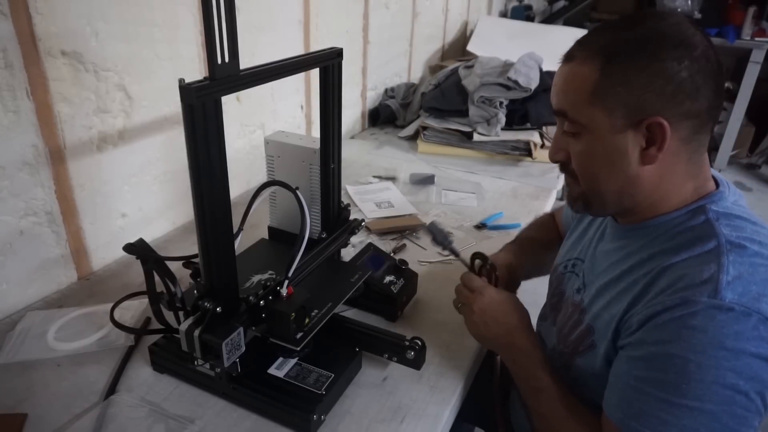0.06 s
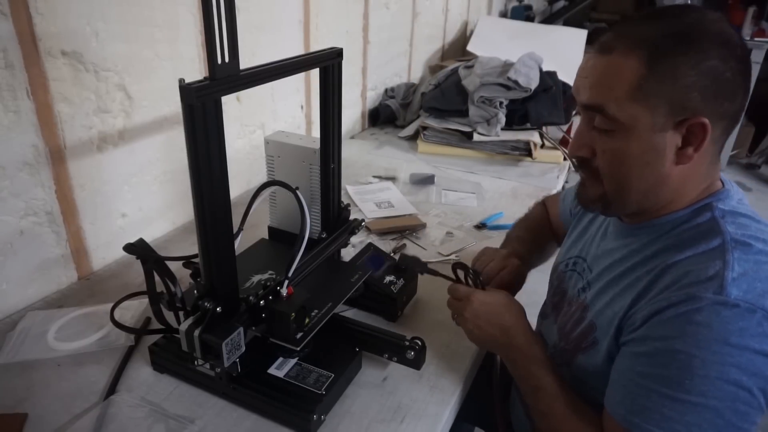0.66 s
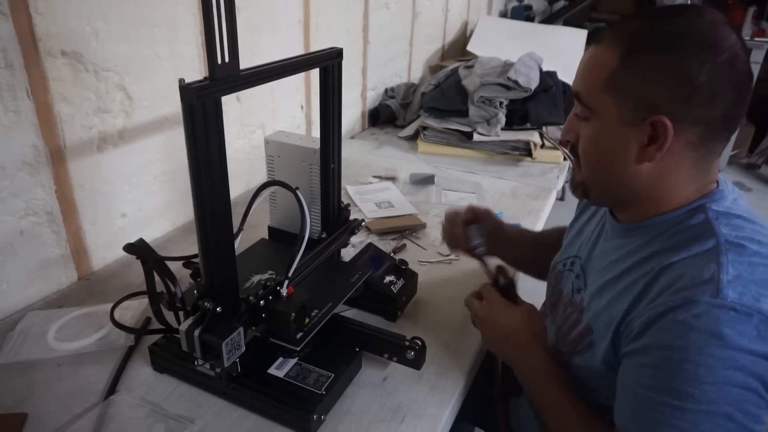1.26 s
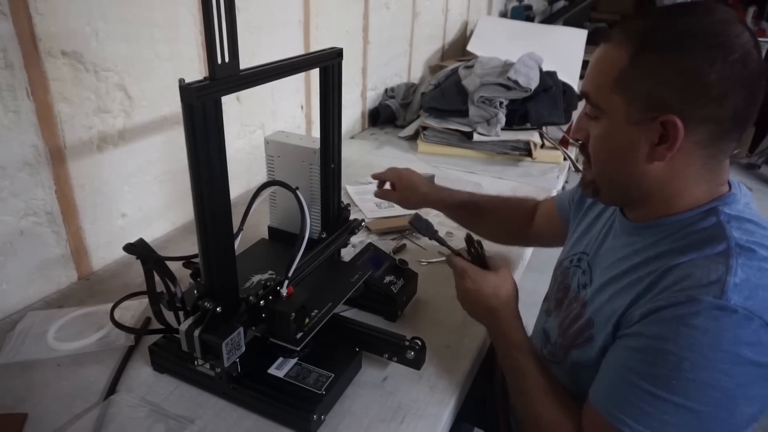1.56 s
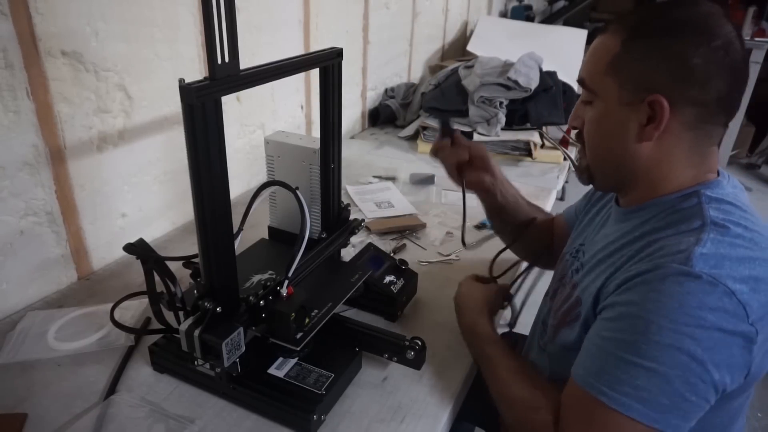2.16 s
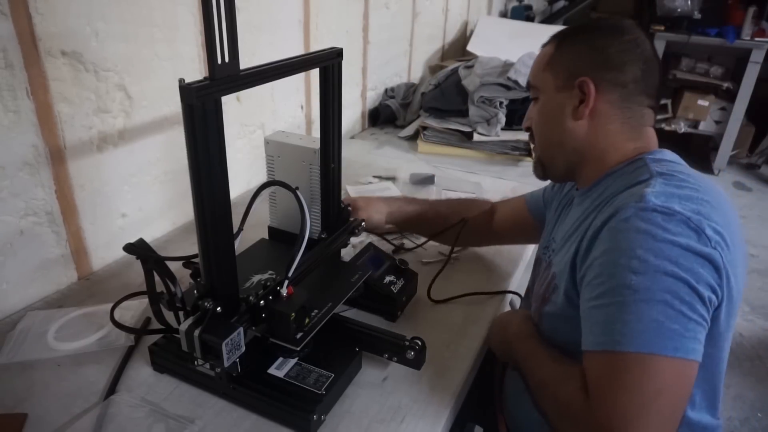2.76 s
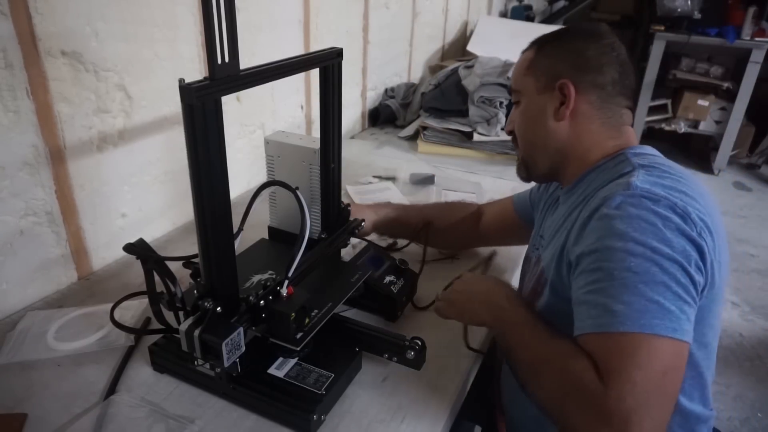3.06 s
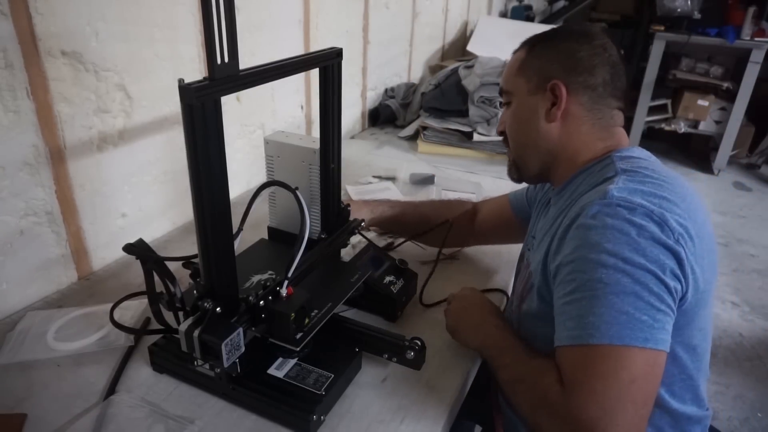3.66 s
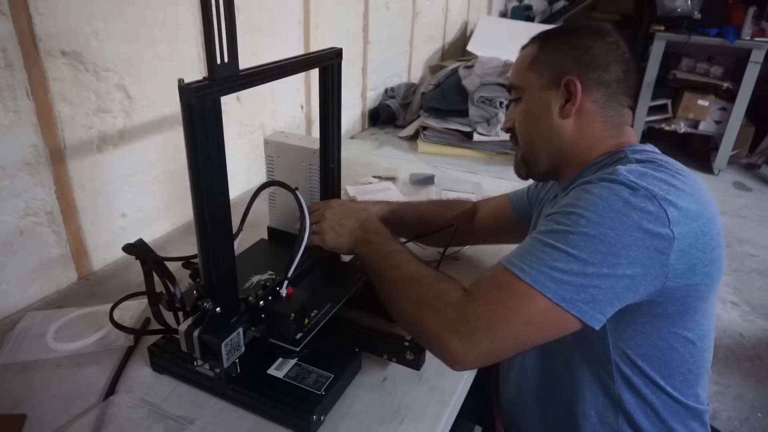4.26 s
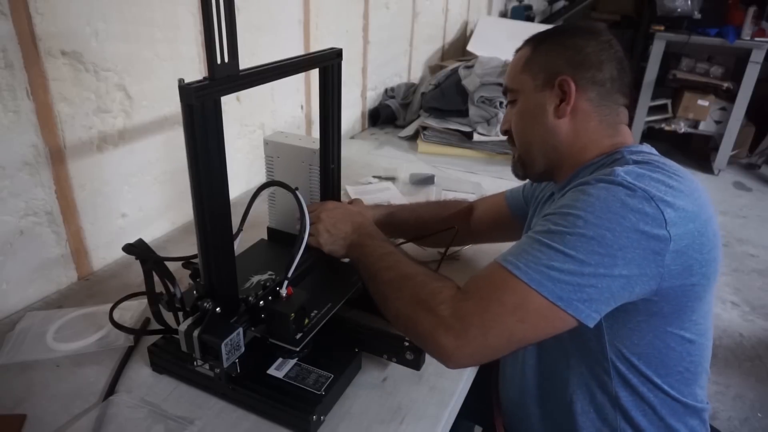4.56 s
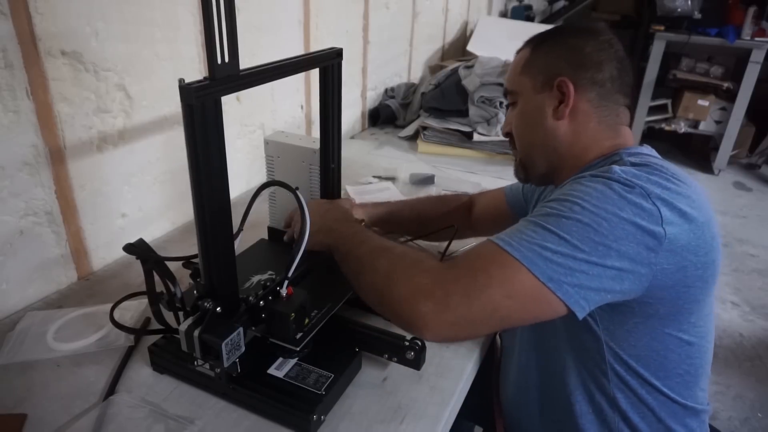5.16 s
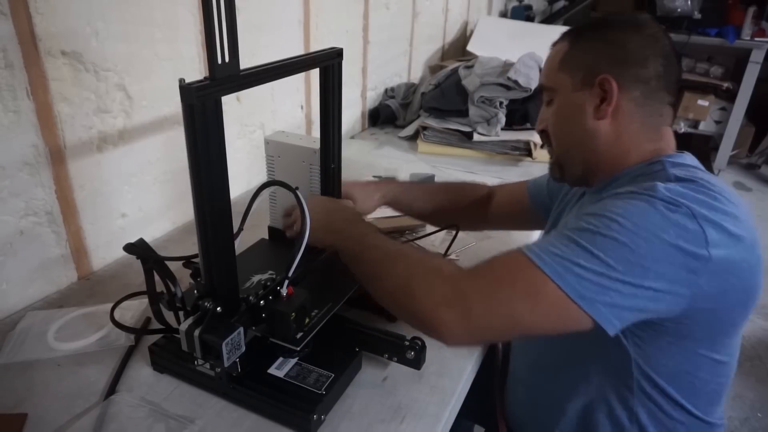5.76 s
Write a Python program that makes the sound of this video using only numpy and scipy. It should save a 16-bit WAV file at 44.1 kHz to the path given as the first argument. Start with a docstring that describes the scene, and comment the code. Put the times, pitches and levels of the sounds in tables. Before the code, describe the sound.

Loud slaps of a cable and plug on a ringing workbench, followed by light plastic taps, dull bumps and a snap as it plugs in.

```python
"""Faint ticks and the brush of a sleeve come first, then loud slaps as a power cord is unwound.
Its plug and loops hit a workbench, which rings, and bump a small machine's metal frame.
The cord drags over the bench and jingles a small steel part. Then the plug is fumbled into its
socket with light ticks, dull bumps and a snap. A bare workshop echoes, over a low rumble and hiss."""
import sys
import numpy as np
from scipy import signal
from scipy.fft import rfft, irfft, next_fast_len
from scipy.io import wavfile
from scipy.ndimage import uniform_filter1d

SR = 44100
rng = np.random.default_rng(int(sys.argv[2]) if len(sys.argv) > 2 else 0)


def unload_wav(signal):
    """Save mono or channel-first audio to the path in sys.argv[1] as 16-bit WAV at rate SR, clipped to [-1, 1]."""
    wavfile.write(
        sys.argv[1],
        SR,
        np.round(np.clip(np.atleast_2d(signal).T, -1, 1) * 32767).astype(np.int16),
    )


N = 261072
T = np.arange(SR // 2) / SR  # seconds within one hit


# Hits on the bench: start_s, level_db, hardness_db (plug high, soft cord low), thump_db, hollow_db
BENCH_HITS = [(1.664, -25, 7.5, -14, -3), (1.872, -36, 5, -12, -5), (2.0585, -17.5, -3, -15, 0),
              (2.1875, -26.5, -7, -21, -1), (2.425, -20, 1.5, -8.5, -2.5), (2.487, -20.5, -0.5, -6.5, -4.5),
              (2.627, -17.5, 1, -9.5, -4), (2.721, -18.5, -1.5, -4, -8.5), (2.804, -23, -1, -10, -11.5),
              (2.837, -25.5, -0.5, -19, -6), (2.917, -27.5, -1, -14, -15), (2.999, -34, 9, -25, -12),
              (3.038, -20, 1, -14.5, -7.5), (3.159, -28.5, -2.5, -14.5, -6.5),
              (3.204, -30.5, -12, -15, -8.5), (3.522, -35.5, -4.5, -13.5, -2), (3.546, -37.5, -8, -3, -12),
              (3.576, -43.5, 4, -4, -3), (3.639, -15, -.5, -14.5, -8.5), (3.738, -18, 0, -15.5, -5.5)]
# The bench's own notes: pitch_hz, level_db, fade_s (a fade is the time to drop by 60 dB)
BENCH_NOTES = [(164.1, -3, 0.38), (185.7, -9.5, 0.37), (306.7, -2, 0.34), (386.6, -4.5, 0.29),
               (466.7, -2, 0.27), (484, -10.5, 0.23), (575, -7, 0.26), (634.5, 3, 0.14), (760, 2, 0.12),
               (862, -14, 0.15), (1002, -8, 0.18), (1065, -8.5, 0.2), (1136, -12, 0.18), (1317, -5.5, 0.22),
               (1448, -5.5, 0.22), (1964, -15.5, 0.46), (2270, -10, 0.27), (2510, -3, 0.098),
               (2750, -21, 0.29)]
# The tone of a slap: pitch_hz, level_db
SLAP_TONE = [(40, -39), (100, -20.5), (150, -1), (240, -4), (450, -3), (800, -5.5), (1400, -6),
             (2700, -5.5), (4200, -20.5), (5300, -32.5), (9000, -42.5), (13000, -39), (16000, -49)]
# A hit's thump, hollow knock, body, clack and snap: low_hz, high_hz
HIT_BANDS = [(100, 300), (300, 600), (600, 1500), (1500, 4500), (5000, 15000)]
def bench_slaps(clack_db=-6.5, snap_db=-25, snap_growth=2.04, notes_db=-3):
    """Plug and cord slap the bench, which rings; a harder hit gains clack, and even more snap."""
    out = np.zeros((2, N))
    for start_s, db, hardness, thump, hollow in BENCH_HITS:
        crack = contact(crack_db=2.5, crack_fade_s=0.016, bounce_db=0, echo_db=-12.5, echo_fade_s=0.4)
        slap = colour(crack, SLAP_TONE)
        board = ring(BENCH_NOTES, scatter_db=3.55)
        board = colour(board, [(30, -23), (140, 3.5)])  # a small board gives no deep bass
        hit = unit(slap) + amp(notes_db) * unit(board)
        bands_db = db + np.array([thump, hollow, 0, clack_db + hardness, snap_db + snap_growth * hardness])
        add(out, start_s, set_bands(hit, HIT_BANDS, bands_db, samples=SR // 20))
    return stereo(out, STEREO_WIDTH, left_db=-3.5)


# Light taps of the plug: start_s, level_db, hardness_db, scrape_s
PLUG_TAPS = [(.612, -62, 7, 0.0088), (.837, -58, 5, .01), (1.097, -58.5, 1.5, 0.0072),
             (1.146, -61.5, 13.5, 0.018), (1.194, -62, 11, .001), (1.643, -46, 6, .001),
             (1.743, -44, 5, .008), (1.999, -46.5, 5, 0.0057), (3.394, -42.5, -17, 0.0084),
             (4.122, -41.5, -12.5, 0.0035), (4.381, -46.5, -6, .005), (4.41, -47.5, -8, .03),
             (4.526, -42.5, -14, .004), (4.558, -39, -8.5, 0.037), (4.658, -43.5, -8.5, 0.015),
             (4.709, -44, -4.5, 0.015), (4.876, -40, -6.5, .003), (5.004, -39.5, -1, 0.0086),
             (5.084, -40, -4, .0075), (5.408, -47.5, -4.5, .02), (5.493, -30.5, 1, 0.0049),
             (5.724, -47, -3, .012), (5.799, -52, 6.5, 0.0027)]
# The notes of the plug's shell: pitch_hz, level_db, fade_s
SHELL_NOTES = [(712, -5, 0.11), (1416, -1.5, 0.11), (1720, -4, 0.065), (2130, -11, 0.2), (2720, 0.5, 0.035),
               (3090, -3, 0.032), (3560, -14, .11)]
# The tone of tapped plastic: pitch_hz, level_db
PLASTIC_TONE = [(60, -20), (250, 0), (600, 2.5), (1500, 4.5), (3200, 8), (4500, -4.5), (7000, -8),
                (16000, -14)]
# A tap's body, clack and snap: low_hz, high_hz
TAP_BANDS = [(400, 1500), (1500, 4500), (5000, 15000)]
def plug_ticks(snap_db=-15.5, snap_growth=1.9, shell_db=-7):
    """The plug taps and skids on fingers, cord and socket rim; its shell rings. Harder is brighter."""
    out = np.zeros((2, N))
    for start_s, db, hardness, scrape_s in PLUG_TAPS:
        crack = contact(crack_db=10.5, crack_fade_s=0.016, bounce_db=-2.5, echo_db=-4, echo_fade_s=0.34)
        tap = unit(colour(crack, PLASTIC_TONE))
        pressure = np.interp(T / scrape_s, [0, 0.5, 1], [0.4, 1, 0])
        shell = amp(shell_db) * unit(ring(SHELL_NOTES, scatter_db=4))
        skid = chatter(tap + shell, pressure, per_s=700)
        bands_db = db + np.array([0, hardness, snap_db + snap_growth * hardness])
        add(out, start_s, set_bands(skid, TAP_BANDS, bands_db, samples=SR // 25))
    return stereo(out, STEREO_WIDTH, left_db=-3.5)


# The tone of the socket's springs: pitch_hz, level_db
SPRING_TONE = [(1500, -30), (4000, -5), (4900, 1.5), (5600, -12), (8000, -16), (14000, -38)]
def socket_snap(start_s=5.494, level_db=-36):
    """The plug snaps home with a dry, bright crack of the contact springs."""
    out = np.zeros((2, N))
    crack = contact(crack_db=10.5, crack_fade_s=0.026, bounce_db=-3, echo_db=-11, echo_fade_s=0.35)
    snap = colour(crack, SPRING_TONE)
    add(out, start_s, amp(level_db) * snap / np.std(snap[0, :SR // 33]))
    return stereo(out, STEREO_WIDTH, left_db=-2)


# Pushes on the machine's frame: start_s, level_db
FRAME_PUSHES = [(2.72, -27), (4.4, -36.5), (4.477, -32.5), (4.603, -21.5), (4.832, -23), (5.44, -34),
                (5.519, -23.5), (5.544, -22.5), (5.765, -29.5)]
# The frame's low notes: pitch_hz, level_db, fade_s
FRAME_NOTES = [(52, -24, 0.32), (81, -27, 0.46), (133, -23, 0.56), (155.4, 1.5, 0.26), (190, -12.5, 0.11),
               (310.6, -11.5, 0.197)]
# The tone of the trembling bench: pitch_hz, level_db
SHAKE_TONE = [(20, -17), (55, -9), (150, 4.5), (220, -8), (500, -26), (2000, -76)]
def frame_bumps(rise_s=0.0045, shake_db=-14, shake_fade_s=0.7, rock_s=0.09, rock_loss_db=9):
    """A soft push rings the frame and shakes the bench; then the frame rocks back once, softer."""
    out = np.zeros((2, N))
    swell = 1 - np.exp(-T / rise_s)
    for start_s, db in FRAME_PUSHES:
        for delay_s, loss_db in [(0, 0), (rock_s, rock_loss_db)]:
            tremble = unit(colour(rng.standard_normal(len(T)), SHAKE_TONE))
            shake = amp(shake_db - 60 * T / shake_fade_s) * tremble
            frame = ring(FRAME_NOTES, scatter_db=1.1)[0]
            add(out, start_s + delay_s, amp(db - loss_db) * (frame + shake) * swell)
    return out


# Nudges of the steel part: start_s, level_db, fade_ratio (multiplies each fade_s below)
STEEL_NUDGES = [(2.864, -34, 0.43), (2.922, -45, .9), (2.962, -43, 0.9), (2.985, -47, 1),
                (3.263, -59.5, .3), (3.523, -68, 1.5), (4.560, -63, 2), (4.614, -65, 2)]
# The steel part's high notes: pitch_hz, level_db, fade_s
STEEL_NOTES = [(7450, -18, .15), (7920, -4, 0.15), (11510, -10, 0.16), (11990, -7, .14), (12310, -4, 0.22),
               (12610, -12, 0.12), (13210, -13, .4)]
def steel_jingles(rattle_fade_s=0.086, grit_db=-6):
    """A small steel part rattles, and every touch makes it ring."""
    out = np.zeros((2, N))
    for start_s, db, fade_ratio in STEEL_NUDGES:
        metal = ring(np.array(STEEL_NOTES) * [1, 1, fade_ratio], scatter_db=1.4)
        grit = amp(grit_db) * colour(dense_ring(), [(4000, -13), (7500, -7)])
        rattle = chatter(metal + grit, amp(-60 * T / rattle_fade_s), per_s=600)
        add(out, start_s, amp(db) * rattle / np.std(rattle[0, :SR // 20]))
    return stereo(out, STEREO_WIDTH, left_db=0)


# The tone of the cord rubbing on the bench: pitch_hz, level_db
DRAG_TONE = [(47, -51), (80, -4.5), (152, 1.5), (361, -7), (404, 1), (1020, -0.5), (1120, -4), (2430, -12),
             (6310, -34), (7700, -37), (10500, -39.5), (12000, -37), (16000, -36)]
def cord_drag(peak_slips_per_s=300, spread_db=4, rub_db=-7, thinning=0.27):
    """The rubber cord sticks and slips, more often when faster; slips ring the bench over a soft rub."""
    speed_db = pull_speed_db()
    busyness = amp(thinning * (speed_db - speed_db.max()))
    sizes = amp(spread_db * np.minimum(rng.exponential(size=N), 3)) * rng.choice([-1, 1], N)
    slipping = rng.random(N) < busyness * peak_slips_per_s / SR
    slips = slipping * sizes / np.sqrt(busyness)
    crack = contact(crack_db=10.5, crack_fade_s=0.0084, bounce_db=-8, echo_db=-13.5, echo_fade_s=0.3)
    crackle = signal.fftconvolve(slips[None], crack, axes=1)[:, :N]
    scrape = unit(colour(crackle, DRAG_TONE))
    rub = amp(rub_db) * unit(colour(rng.standard_normal((2, N)), DRAG_TONE))
    return amp(speed_db) * unit(stereo(scrape + rub, STEREO_WIDTH, left_db=-1.5))


# Pulls on the cord: start_s, length_s, level_db
CORD_PULLS = [(1.74, .1, -40), (1.96, .09, -45), (2.5, .29, -41), (2.872, .16, -26), (3.1, 0.2, -37),
              (3.58, .12, -36), (3.912, 0.033, -43.5), (4.346, 0.52, -50.5), (5.024, 0.036, -44),
              (5.5, 0.3, -54)]
def pull_speed_db(grab_db_per_s=200, coast_db_per_s=120, floor_db=-90):
    """The cord's speed: each pull picks up, holds and coasts to rest."""
    t = np.arange(N) / SR
    speed_db = np.full(N, floor_db)
    for start_s, length_s, db in CORD_PULLS:
        grab_db = grab_db_per_s * np.maximum(start_s - t, 0)
        coast_db = coast_db_per_s * np.maximum(t - start_s - length_s, 0)
        speed_db = np.maximum(speed_db, db - grab_db - coast_db)
    return speed_db


# The tone of brushing cloth: pitch_hz, level_db
CLOTH_TONE = [(60, -24), (300, 1.5), (900, -5.5), (2600, -5.5), (6000, -15.5), (12000, -13.5), (16000, -21)]
def sleeve(start_s=1.17, length_s=1, level_db=-49.5, flutter_db=0.5):
    """Cloth brushes along the arm, swelling and fading as it reaches out and back."""
    progress = np.clip((np.arange(N) / SR - start_s) / length_s, 0, 1)
    swell = np.sqrt(abs(np.sin(np.pi * progress)))
    flutter = amp(flutter_db * unit(uniform_filter1d(rng.standard_normal(N), size=SR // 30)))
    brush = colour(rng.standard_normal((2, N)), CLOTH_TONE)
    return amp(level_db) * swell * flutter * unit(stereo(brush, STEREO_WIDTH, left_db=-2.5))


# The tone of the room's rumble and hiss: pitch_hz, level_db
ROOM_TONE = [(12, -40), (20, -12), (32, -3), (216, 0.5), (248, -1.5), (347, -5.5), (759, -12), (873, -15.5),
             (1290, -9.5), (1570, -18.5), (1710, -15.5), (3840, -21), (7110, -25.5), (16000, -27)]
# How wide the room sounds: pitch_hz, side_db
ROOM_WIDTH = [(60, -22), (150, -14), (380, -1), (950, 2.5), (2380, 0.5), (5980, 0.5), (15000, -1)]
def room(level_db=-52.5, hum_hz=119, hum_db=-12):
    """The workshop rumbles, hisses and hums faintly."""
    noise = colour(rng.standard_normal((2, N)), ROOM_TONE)
    air = unit(stereo(noise, ROOM_WIDTH, left_db=-1))
    hum = amp(hum_db) * np.sin(2 * np.pi * hum_hz * np.arange(N) / SR)
    return amp(level_db) * (air + hum)


def room_dip(sound, above_db=-13.5, recover_db_per_s=3):
    """The background's volume drops at once under a loud sound, then creeps back up."""
    power = uniform_filter1d(sound.mean(axis=0) ** 2, size=SR // 20)
    loud_db = 10 * np.log10(abs(power) + 1e-12)
    creep_db = recover_db_per_s * np.arange(N) / SR
    dip_db = np.minimum(above_db - loud_db - creep_db, 0)
    return amp(creep_db + np.minimum.accumulate(dip_db))


def contact(crack_db, crack_fade_s, bounce_db, echo_db, echo_fade_s, edge_db=4, edge_fade_s=0.0044):
    """Two things meet: a bright-edged crack, a quick bounce, a short ring and the room's echo."""
    since_bounce = T - rng.uniform(0.0042, 0.01)
    bounce = amp(bounce_db - 60 * abs(since_bounce) / crack_fade_s) * (since_bounce > 0)
    cracks = amp(crack_db) * (amp(-60 * T / crack_fade_s) + bounce)
    echo = amp(echo_db - 60 * T / echo_fade_s)
    edge = amp(crack_db + edge_db - 60 * T / edge_fade_s) * rng.standard_normal((2, len(T)))
    edge = colour(edge, [(2000, -29), (7000, -1)])
    return dense_ring() + (cracks + echo) * rng.standard_normal((2, len(T))) + edge


def ring(notes, scatter_db):
    """A struck object's fading notes, at new strengths each time, as a mid and side pair."""
    hz, db, fade_s = np.transpose(notes)[:, :, None]
    strength = amp(db + scatter_db * rng.standard_normal(hz.shape) - 60 * T / fade_s)
    strength *= rng.choice([-1, 1], hz.shape)
    phase = 2 * np.pi * hz * T
    side = np.cos(phase) * rng.choice([-1, 1], hz.shape) * (1 - np.exp(-phase))
    return np.sum(strength * np.array([np.sin(phase), side]), axis=1)


# How long the bench and nearby walls ring: pitch_hz, fade_s
RING_FADES = [(100, 0.49), (300, 0.4), (700, 0.29), (2000, 0.19), (4500, 0.2), (9000, 0.22), (16000, 0.064)]
def dense_ring():
    """Countless notes and echoes blur together, the high ones dying first."""
    hz, t, spectrum = signal.stft(rng.standard_normal((2, len(T))), SR, nperseg=256)
    fade = amp(-60 * t / along(RING_FADES, hz)[:, None])
    return signal.istft(spectrum * fade, SR, nperseg=256)[1][:, :len(T)]


def chatter(sound, force, per_s):
    """Repeat a sound in a quick, uneven run of touches that follow a force curve."""
    touches = np.where(rng.random(len(T)) < per_s / SR, rng.standard_normal(len(T)), 0) * force
    touches[0] += force[0]
    return signal.fftconvolve(sound, touches[None], axes=1)[:, :len(T)]


def set_bands(hit, bands, levels_db, samples):
    """Bring each pitch band to its wanted level over the first samples of a hit."""
    centres = np.sqrt(np.prod(bands, axis=1))
    for _ in range(2):  # twice, as neighbouring bands overlap
        hz, power = signal.periodogram(hit[0, :samples], SR, nfft=4096, detrend=False)
        now_db = [10 * np.log10(power[(hz > low) & (hz < high)].sum() * hz[1]) for low, high in bands]
        hit = colour(hit, np.column_stack([centres, np.subtract(levels_db, now_db)]))
    return hit


# How wide the sounds at the bench are: pitch_hz, side_db
STEREO_WIDTH = [(100, -28), (250, -23), (400, -20), (700, -14), (1300, -9), (2400, -7), (4400, -2),
                (8000, -3), (15000, -4)]
def stereo(pair, width, left_db):
    """Turn mid (what both ears share) and side (what differs) into left and right; treble can lean."""
    mid, side = pair[0], colour(pair[1], width)
    lean_curve = [(350, 0), (1200, left_db / 2), (7000, left_db / 2), (11000, 0)]
    lean_db = along(lean_curve, np.fft.rfftfreq(N, 1 / SR))
    return irfft(rfft([mid + side, mid - side]) * amp([lean_db, -lean_db]), N)


def colour(sound, tone):
    """Filter a sound by a curve of (pitch_hz, level_db) points."""
    size = 2 * next_fast_len(sound.shape[-1] // 2 + SR // 20)
    cepstrum = irfft(np.log(amp(along(tone, np.fft.rfftfreq(size, 1 / SR)))))
    cepstrum[1:size // 2] *= 2  # folded forward, so nothing rings before its hit
    cepstrum[size // 2 + 1:] = 0
    return irfft(rfft(sound, size) * np.exp(rfft(cepstrum)), size)[..., :sound.shape[-1]]


def along(points, hz):
    """Read between (pitch_hz, value) points on a log scale of pitch."""
    pitches, values = np.transpose(points)
    return np.interp(np.log(hz + 1), np.log(pitches + 1), values)


def add(track, start_s, sound):
    """Mix a sound into a track at a given time."""
    part = track[:, round(start_s * SR):][:, :sound.shape[-1]]
    part += sound[..., :part.shape[-1]]


def amp(db):
    """Turn decibels into a multiplier."""
    return 10 ** (np.asarray(db) / 20)


def unit(sound):
    """Scale a sound to an average power of 1."""
    return sound / np.sqrt(np.mean(sound ** 2) + 1e-20)


def scene():
    """All the handling at the bench, over the room's background."""
    handling = bench_slaps() + plug_ticks() + socket_snap() + frame_bumps()
    handling += steel_jingles() + cord_drag() + sleeve()
    return handling + room_dip(handling) * room()


def record(dry, top_hz=16000):
    """Round off the loudest peaks and cut the very highest treble."""
    rounded = dry / (1 + abs(dry) ** 6) ** (1 / 6)
    size = next_fast_len(N + SR // 2)
    kept = np.fft.rfftfreq(size, 1 / SR) < top_hz
    return irfft(rfft(rounded, size) * kept, size)[:, :N]


dry = scene()
out = record(dry)
unload_wav(out)
```